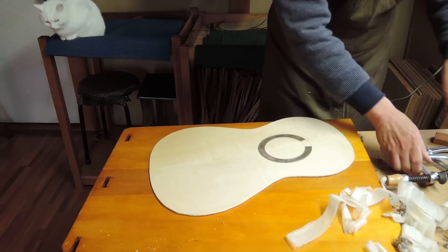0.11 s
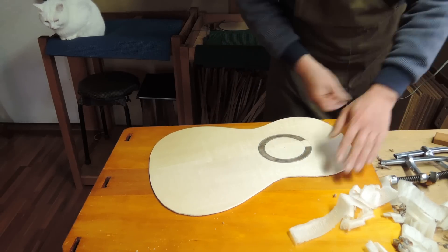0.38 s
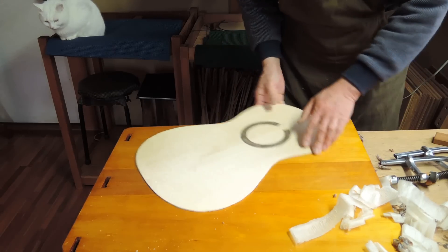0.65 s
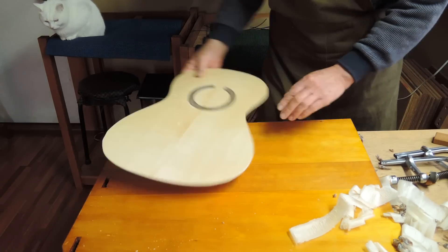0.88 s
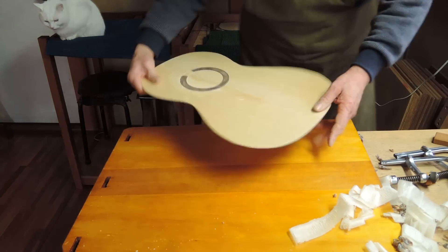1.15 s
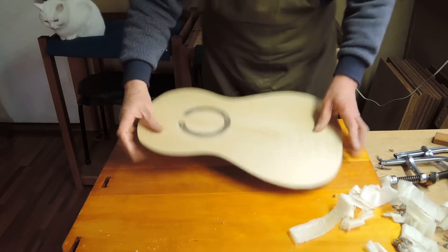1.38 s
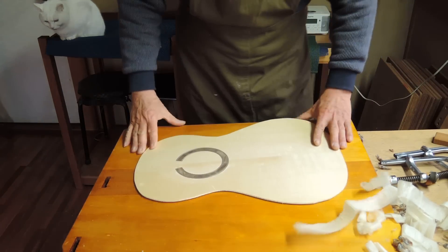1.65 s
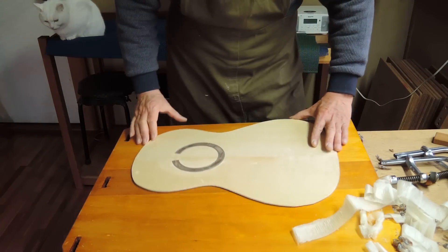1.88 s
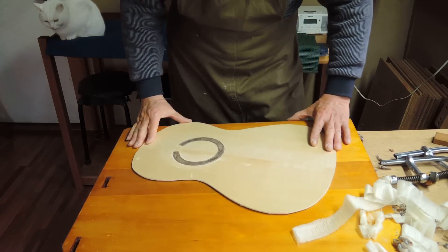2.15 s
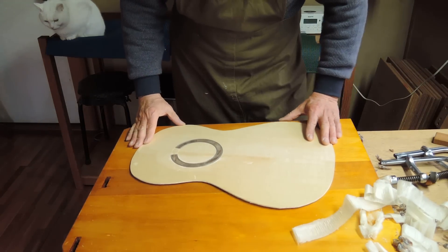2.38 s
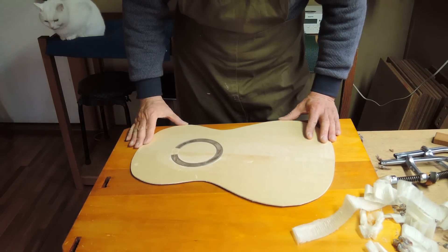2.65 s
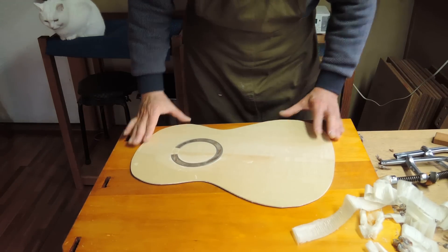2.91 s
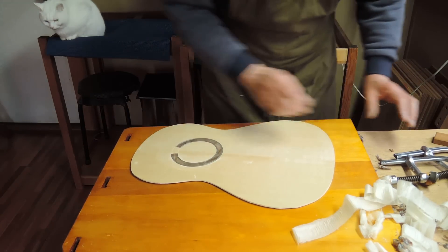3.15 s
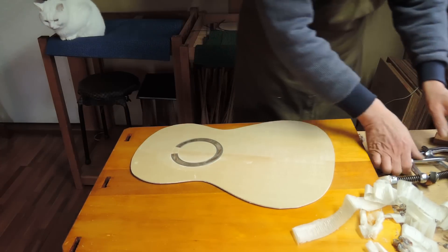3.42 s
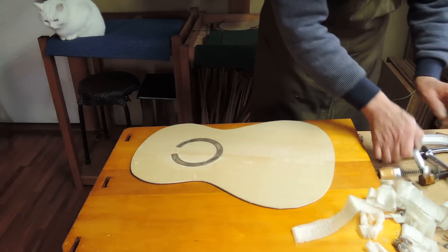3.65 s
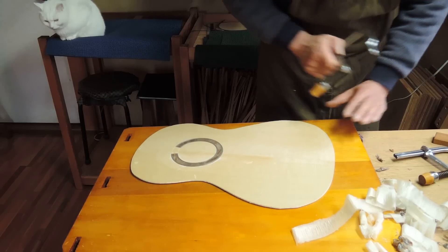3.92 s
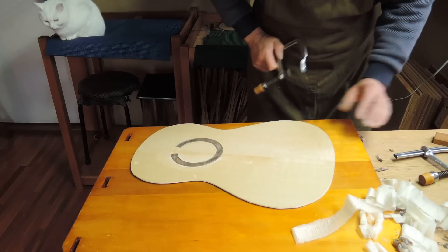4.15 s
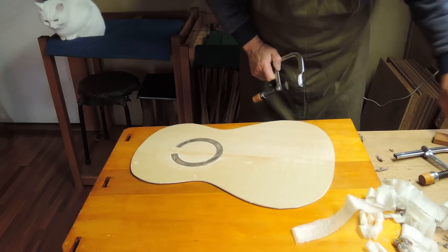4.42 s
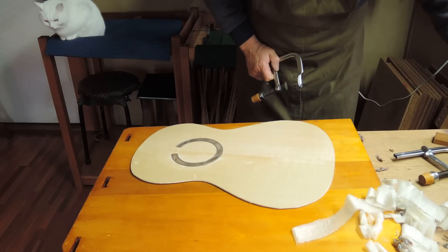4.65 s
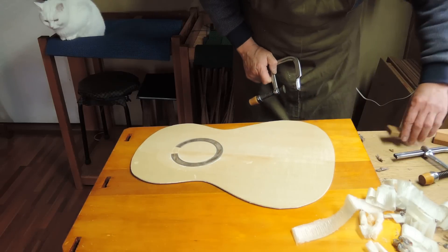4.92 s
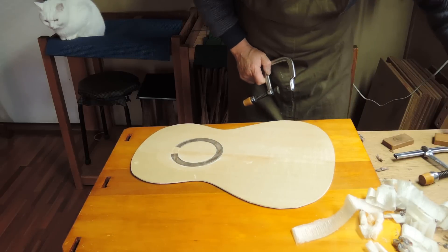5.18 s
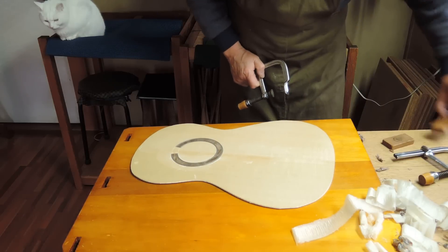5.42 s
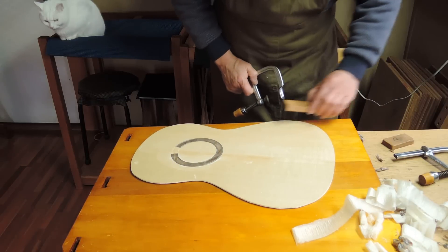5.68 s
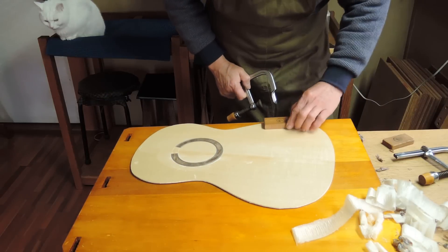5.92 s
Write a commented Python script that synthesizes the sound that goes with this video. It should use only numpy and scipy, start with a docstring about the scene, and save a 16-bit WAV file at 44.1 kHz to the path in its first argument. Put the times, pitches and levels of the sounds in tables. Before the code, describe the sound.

Clamps and a wooden block knock rapidly on a bench, bright metal ringing among the woody cracks. A thin wooden panel is handled with light grainy swishes, drops with a dry clack, and is nudged quietly. Later a clamp is dragged off with a scuff and clink; after near silence, wooden blocks strike loudly. Close microphones, short room reverberation, soft rumbling air.

```python
"""Wooden blocks and steel clamps knock on a workshop bench, with a thin wooden panel laid down and slid
between the knocks. Knocks are dying sines with a noisy crack, clamp steel adds high ringing,
rubbing is grainy filtered noise and a held clamp squeaks as a pure tone. Decaying sparse taps make the
reverberant room, with room tone beneath; close stereo microphones feed a gain control and soft limiter."""
import sys
import numpy as np
from scipy import signal
from scipy.io import wavfile
from scipy.ndimage import uniform_filter1d

SR = 44100
rng = np.random.default_rng(int(sys.argv[2]) if len(sys.argv) > 2 else 0)


def decibels_to_gain(level_db):
    """Convert a level in decibels to a linear amplitude gain (20 dB per decade)."""
    exponent = np.asarray(level_db, float) / 20
    return 10 ** exponent


def master(y):
    """Save y as 16-bit WAV."""
    cut = np.clip(np.atleast_2d(y).T, -1, 1)
    pcm = np.round(cut * 32767)  # scale
    wavfile.write(sys.argv[1], SR, pcm.astype(np.int16))


N = 266805

# hands, panel and tools rubbing the bench: (time of full pressure [s], hold [s],
# dull scuff level [dB], bright hiss level [dB], airy fizz level [dB])
STROKES = [(0.776, 0.04, -93, -55.5, -64.5), (0.917, 0.067, -68, -49, -71), (1.12, 0.095, -57, -65, -74),
           (1.23, 0.083, -68, -59, -71), (1.366, 0.0072, -52.5, -53, -51),
           (1.428, 0.034, -51.5, -50.5, -78), (1.547, 0.018, -50, -49, -59),
           (1.78, 0.0099, -56, -55.5, -61), (1.947, 0.024, -65, -54.5, -82), (2.059, 0.04, -79, -55, -67),
           (2.29, 0.13, -70, -62.5, -69.5), (2.448, 0.011, -76, -51, -60), (2.51, 0.14, -62.5, -56.5, -82),
           (3.076, 0.004, -54, -61, -76), (3.13, 0.98, -61, -82, -80.5), (3.738, 0.077, -37, -68, -65.5),
           (3.989, 0.39, -57.5, -64.5, -87), (4.045, 0.0036, -79, -53.5, -65),
           (5.388, 0.024, -38, -48.5, -104.5)]


def evened(x):
    """Scales a sound to an rms of one."""
    return x / np.sqrt(np.mean(x ** 2) + 1e-20)


def read(points, hz):
    """Reads a table of (frequency [Hz], value) along a logarithmic pitch axis."""
    f, value = np.transpose(points)
    return np.interp(np.log(hz + 1), np.log(f + 1), value)


def coloured(x, points):
    """Causal minimum-phase filter with the given spectrum, so a crack keeps its sharp front."""
    hz = np.abs(np.fft.fftfreq(4096, 1 / SR))
    log_gain = np.log(decibels_to_gain(np.maximum(read(points, hz), -100)))
    phase = -signal.hilbert(log_gain).imag
    taps = np.fft.ifft(np.exp(log_gain + 1j * phase)).real[:2048]
    taps = taps.reshape((1,) * (x.ndim - 1) + (-1,))
    return signal.oaconvolve(x, taps, axes=-1)[..., :x.shape[-1]]


def noise(shape_db, size, channels):
    """Random short-time spectra under a (bins, frames) level field."""
    real, imag = rng.standard_normal((shape_db.shape[1], size // 2 + 1, channels, 2)).T
    spectra = (real + 1j * imag) * decibels_to_gain(shape_db)
    return signal.istft(spectra, nperseg=size, noverlap=size * 3 // 4)[1][:, :N]


def tilted(points, slope_db, pivot_hz):
    """Leans a spectrum or mode table by dB per octave."""
    return [(hz, db + slope_db * np.log2(hz / pivot_hz), *rest) for hz, db, *rest in points]


def duller(points, slope_db, pivot_hz):
    """Leans only what lies above the pivot: a soft blow loses treble, not bass."""
    return [(hz, db + slope_db * max(np.log2(hz / pivot_hz), 0), *rest) for hz, db, *rest in points]


def ring(modes, spread_db):
    """Dying sines (Hz, dB, t60 s) swell over a first cycle; each share varies at random blow to blow."""
    hz, db, t60 = np.transpose(modes)[..., None]
    t = np.arange(SR // 2) / SR
    swell = np.sin(np.pi / 2 * np.minimum(hz * t, 1)) ** 2
    share_db = db + spread_db * rng.standard_normal(hz.shape)
    out = (swell * decibels_to_gain(share_db - 60 * t / t60) * np.sin(2 * np.pi * hz * t)).sum(0)
    return out / np.abs(out).max()


def wooden(peaks, damping):
    """Turns resonance widths into decay times: the wider the peak, the faster it dies."""
    return [(hz, db, np.log(1000) / np.pi / (width * damping)) for hz, width, db in peaks]


def burst(points, t60):
    """A crack: one sharp contact, then a dying chatter of tiny rebounds, in the given colour."""
    rebounds = np.where(rng.random(SR // 2) < 0.06, 1, 0.15)
    chatter = rng.standard_normal(SR // 2) * rebounds
    chatter[0] = 1.1  # the sharp contact
    decay = decibels_to_gain(-60 * np.arange(SR // 2) / SR / t60)
    out = coloured(chatter * decay, points)
    return out / np.abs(out).max()


def knocks(rows, peaks, blow, damping, crack_db, crack_t60, own_db, own_cycles,
           lean_db, lean_per_db, frame_lean_db):
    """Each blow rings wood, an own mode and the bench frame, with crack and tick; hard ones are brighter."""
    # resonances of the bench frame: (frequency [Hz], width before damping [Hz], level [dB])
    bench_frame = [(70, 4.9, -14.5), (106, 11, -8.5), (197, 13, 5.5), (270, 12, -4), (385, 9, -2)]
    # colour of the edge tick: (frequency [Hz], level [dB])
    tick_colour = [(2500, -3), (4000, -7), (11500, -19), (14000, -55)]
    out = np.zeros(N + SR)
    for s, db, hz, thump_db, tick_db in rows:
        hard_db = lean_db + lean_per_db * db  # per octave
        wood = ring(tilted(wooden(peaks, damping), hard_db, 1000), 0.9)
        own = ring([(hz, 0, own_cycles / hz)], 0)
        crack = burst(duller(blow, hard_db, 890), crack_t60)
        sound = wood + decibels_to_gain(own_db) * own + decibels_to_gain(crack_db) * crack
        sound = decibels_to_gain(db) * sound / np.abs(sound).max()
        sound += decibels_to_gain(thump_db) * ring(tilted(wooden(bench_frame, 0.92), frame_lean_db, 200), 2.4)
        sound += decibels_to_gain(tick_db) * burst(tick_colour, 0.042)
        out[round(s * SR):][:len(sound)] += sound
    return out[:N]


def air():
    """Room tone, alike in both microphones at low pitch; its rumble swells and fades."""
    # colour of the room tone: (frequency [Hz], level [dB])
    tone = [(15, -8), (31, 0.5), (46, -12), (332, -16), (1200, -19.5), (15500, -44)]
    # left-right likeness: (frequency [Hz], correlation [-1 to 1])
    likeness = [(60, 0.68), (380, 0.68), (2380, 0.33), (15000, 0.16)]
    hz = np.fft.rfftfreq(2048, 1 / SR)
    same = np.clip(read(likeness, hz), -0.99, 0.99)[:, None]
    swell = evened(uniform_filter1d(rng.standard_normal(N // 512 + 5), size=24))
    rumble_db = 2.2 * swell / (1 + (hz[:, None] / 150) ** 2)
    shape_db = read(tone, hz)[:, None] + rumble_db
    mid = noise(shape_db + 10 * np.log10(1 + same), size=2048, channels=1)[0]
    side = noise(shape_db + 10 * np.log10(1 - same), size=2048, channels=1)[0]
    return decibels_to_gain(-53.5) * evened(np.array([mid + side, mid - side]))


def blocks():
    """Wooden blocks dropped on the bench: broad, heavily damped resonances and a short crack."""
    # drops: (time [s], level [dB], own ring [Hz], bench thump level [dB], edge tick level [dB])
    hits = [(0.048, -10, 736, -38, -35), (4.77, -20, 823, -51.5, -57), (4.797, -32, 377, -34.5, -76),
            (5.204, -1.5, 2120, -41, -22.5), (5.207, 0, 2090, -46.5, -46.5), (5.218, 1.5, 2770, -34.5, -29),
            (5.2245, -3, 910, -43, -52), (5.286, -1, 2000, -23, -47), (5.292, -7.5, 2520, -26, -26),
            (5.391, -24, 332, -31, -35)]
    # resonances of the block: (frequency [Hz], width before damping [Hz], level [dB])
    block = [(1200, 190, 0.011), (1620, 110, 0.011), (2950, 270, 0.024)]
    # colour of the crack: (frequency [Hz], level [dB])
    blow = [(150, -40), (260, -14), (900, -3.5), (1550, 0), (3000, -10), (4500, -30.5), (6500, -42.5),
            (12000, -100)]
    return knocks(hits, block, blow, damping=3.5, crack_db=9.0, crack_t60=0.016, own_db=7,
                  own_cycles=16.0, lean_db=0.7, lean_per_db=0.5, frame_lean_db=13)


def clamps():
    """Clamps put down on or dragged off the bench: the bench top resonates under each strong crack."""
    # blows: (time [s], level [dB], own ring [Hz], bench thump level [dB], edge tick level [dB])
    hits = [(0.157, -3, 610, -14.5, -15), (0.178, -6.5, 1200, -39, -27), (0.269, -15, 315, -21, -28),
            (0.279, -7.5, 259, -29, -23), (0.302, -3.5, 880, -31, -24), (0.309, -6.5, 566, -38, -50),
            (0.357, 1, 770, -47, -4.5), (0.362, -1, 713, -21.5, -33), (0.393, -9.5, 880, -58, -38),
            (0.398, -0.5, 615, -24, -38), (0.411, -8.5, 432, -21.5, -9.5), (0.474, -8, 610, -42, -20),
            (0.496, -12, 550, -30, -51), (3.559, -18.5, 950, -38, -29), (3.566, -18, 531, -50, -56),
            (3.766, -7.5, 565, -29, -21.5), (3.781, -13, 524, -23.5, -41), (3.799, -14, 566, -25, -29),
            (3.835, -27, 554, -36, -23.5), (3.841, -11.5, 633, -27, -26)]
    # resonances of the bench top: (frequency [Hz], width before damping [Hz], level [dB])
    bench_top = [(590, 78, -26), (1066, 120, 14)]
    # colour of the crack: (frequency [Hz], level [dB])
    blow = [(110, -39.5), (220, -5), (600, -0.5), (1200, -3.5), (3000, -18), (7000, -76), (14000, -106)]
    return knocks(hits, bench_top, blow, damping=0.72, crack_db=14.5, crack_t60=0.031, own_db=9.5,
                  own_cycles=15.6, lean_db=1.2, lean_per_db=0.75, frame_lean_db=-3.5)


def steel():
    """The clamps' bars and screws ring on in high, lightly damped modes after the sharper blows."""
    # blows that set the steel ringing: (time [s], level [dB], brightness [dB per octave])
    hits = [(0.159, -43, -2), (.359, -25, 1), (0.412, -35, -3), (3.766, -31, 1), (3.835, -38, -16),
            (5.225, -39, -9)]
    # modes of the steel: (frequency [Hz], level [dB], t60 [s])
    modes = [(3490, -8, .07), (5360, 0, .2), (4980, -5, .05), (7020, -6, .1), (10072, -4, .09),
             (10352, -3, .09), (11750, -9, .08), (13750, -14, .06), (14700, -14, .08)]
    out = np.zeros(N + SR)
    for s, db, slope_db in hits:
        out[round(s * SR):][:SR // 2] += decibels_to_gain(db) * ring(tilted(modes, slope_db, 8000), 2)
    return out[:N]


def pressure(level_db, fade_db_per_s):
    """Every stroke presses on fast, holds, and fades; overlapping strokes add in power."""
    start, held = np.transpose(STROKES)[:2, :, None]
    t = np.arange(0, N + 32, 32) / SR
    press_db = 565 * np.maximum(start - t, 0)  # 565 dB a second
    fade_db = fade_db_per_s * np.maximum(t - start - held, 0)
    db = level_db[:, None] - press_db - fade_db
    return np.interp(np.arange(N) / SR, t, np.sqrt((decibels_to_gain(db) ** 2).sum(0)))


def sliding():
    """Skin and wood rubbing: a dull scuff, a bright hiss and an airy fizz, patchy and grainy."""
    # colours of the three rubbing layers: (frequency [Hz], level [dB])
    scuff_colour = [(90, -36), (200, 4.5), (500, 0.5), (1400, -1.5), (3500, -13.5), (8000, -78)]
    hiss_colour = [(1470, -4), (2500, -2.5), (5050, -12), (11900, -23.5), (15500, -53)]
    fizz_colour = [(4000, -7), (8000, -0.5), (12500, -2), (15500, -26)]
    hz = np.fft.rfftfreq(512, 1 / SR)
    patches = rng.standard_normal((N // 128 + 5, len(hz))).T
    patches = evened(uniform_filter1d(uniform_filter1d(patches, 12, 0), 9, 1))  # over pitch, then time
    grain = decibels_to_gain(1.3 * uniform_filter1d(rng.exponential(1, N), 12))

    def rubbing(colour):
        """One layer of noise, uneven over pitch and time."""
        shape_db = read(colour, hz)[:, None] + 2.9 * patches
        return evened(grain * noise(shape_db, size=512, channels=1)[0])

    scuff_db, hiss_db, fizz_db = np.transpose(STROKES)[2:]
    scuff = pressure(scuff_db, fade_db_per_s=153) * rubbing(scuff_colour)
    hiss = pressure(hiss_db, fade_db_per_s=137) * rubbing(hiss_colour)
    fizz = pressure(fizz_db, fade_db_per_s=137) * rubbing(fizz_colour)
    return scuff + hiss + fizz


def panel():
    """Panel touches with bright cracks over damped resonances, plus a few faint low thuds and ticks."""
    # touches, thuds and ticks:
    # (time [s], level [dB], own ring [Hz], bench thump level [dB], edge tick level [dB])
    hits = [(0.945, -64, 300, -48.5, -65), (1.365, -46, 500, -44, -66), (1.424, -34.5, 555, -55, -48),
            (1.636, -7.5, 1660, -29.5, -15.5), (1.643, -16, 1400, -56, -18.5), (1.652, -6.5, 780, -50, -44),
            (1.66, -14.5, 1570, -38.5, -43), (1.668, -11.5, 840, -38.5, -40), (2.29, -70, 250, -45.5, -66),
            (3.07, -53, 2100, -58, -39)]
    # resonances of the panel: (frequency [Hz], width before damping [Hz], level [dB])
    thin_wood = [(787, 34, -7), (1840, 200, -3.5)]
    # colour of the crack: (frequency [Hz], level [dB])
    blow = [(150, -29), (300, -15.5), (800, -15.5), (1700, -7), (4000, -15.5), (10000, -33), (14500, -82)]
    return knocks(hits, thin_wood, blow, damping=2.5, crack_db=12.0, crack_t60=0.03, own_db=2,
                  own_cycles=9.0, lean_db=2.5, lean_per_db=0.64, frame_lean_db=-17.5)


def squeaks():
    """A faint thin tone, a 915 Hz sine, comes and goes while the clamp is held."""
    # squeaks: (time [s], length [s], level [dB])
    tones = [(4.11, .11, -60), (4.66, .11, -56)]
    out = np.zeros(N)
    for s, length, db in tones:
        t = np.arange(round(length * SR)) / SR
        swell = np.sin(np.pi * t / length)
        out[round(s * SR):][:len(t)] += decibels_to_gain(db) * swell * np.sin(2 * np.pi * 915 * t)
    return out


def room(x, wet_db, side_db):
    """Sparse taps dying band by band; three tails take turns, and unrelated tails give the width."""
    # reverberation: (frequency [Hz], t60 [s])
    decay = [(100, 0.32), (300, 0.34), (1000, 0.41), (4000, 0.34), (14000, 0.24)]
    # colour of the side signal: (frequency [Hz], level [dB])
    width = [(60, -19), (240, -34.5), (950, -22), (3770, -11), (15000, 1.5)]
    taps = np.zeros((6, SR))
    at = np.arange(120, SR - 20, 20) + rng.integers(0, 20, (6, (SR - 121) // 20))
    np.put_along_axis(taps, at, rng.choice([-1., 1.], at.shape), 1)
    hz, t, z = signal.stft(taps, SR, nperseg=256)
    dying = z * decibels_to_gain(-60 * t / read(decay, hz)[:, None])
    tails = signal.istft(dying, SR, nperseg=256)[1][:, :SR * 3 // 4]
    tails /= np.linalg.norm(tails, axis=1, keepdims=True)
    # the three shares turn 2.3 times a second at constant total power
    cycles = np.arange(N) / SR * 2.3 + np.arange(3)[:, None] / 3
    turn = np.sqrt(2 / 3) * np.cos(2 * np.pi * cycles)
    wet = signal.fftconvolve(np.tile(x * turn, (2, 1)), tails, axes=1)[:, :N]
    mid = x + decibels_to_gain(wet_db) * wet[:3].sum(0)
    side = decibels_to_gain(side_db) * coloured(wet[3:].sum(0), width)
    return np.array([decibels_to_gain(2.0) * mid + side, decibels_to_gain(1.4) * mid - side])


def scene():
    """Everything on the bench sounds in one room, over the room tone."""
    near = blocks() + clamps() + steel() + sliding() + panel() + squeaks()
    # high-pass at 55 Hz keeps deep bass out of the knocks and rubbing
    near = signal.sosfilt(signal.butter(2, 55, "high", fs=SR, output="sos"), near)
    return room(near, wet_db=-2.0, side_db=2.5) + air()


def roll_off(x):
    """The treble ends steeply here."""
    return signal.sosfilt(signal.butter(12, 15680, fs=SR, output="sos"), x)


def record(dry):
    """Gain backs off on loud knocks and creeps back, rocking a right offset; peaks clip softly, treble ends."""
    power_db = 10 * np.log10(abs(uniform_filter1d((dry ** 2).mean(0), 900)) + 1e-12)
    over_db = np.maximum(power_db + 26, 0) * 0.33
    fall = np.arange(N) * 5.92 / SR  # recovery, dB a second
    held_db = np.maximum.accumulate(over_db + fall) - fall
    gain = decibels_to_gain(-signal.lfilter([0.0004], [1, -0.9996], held_db))
    # the right amplifier's steady offset, behind a coupling capacitor of 0.08 s
    leak = np.exp(-1 / (0.08 * SR))
    drift = signal.lfilter([1, -1], [1, -leak], -0.13 * (gain - 1))
    ducked = dry * gain + drift * np.array([[0], [1]])
    limited = ducked / (1 + ducked ** 6) ** (1 / 6)
    edge = signal.firwin(401, 15350, window=("kaiser", 9), fs=SR)  # sharp end of the treble
    mix = signal.oaconvolve(limited, edge[None], "same")
    return roll_off(mix)


dry = scene()
out = record(dry)
master(out)
```